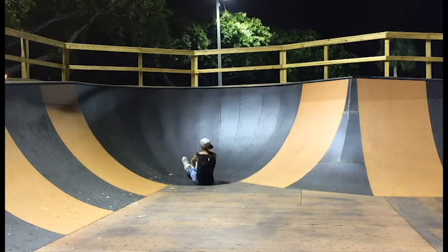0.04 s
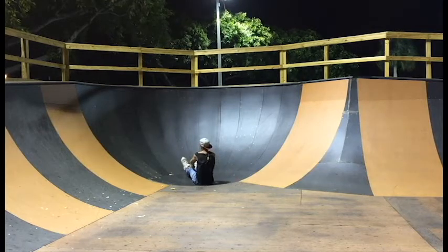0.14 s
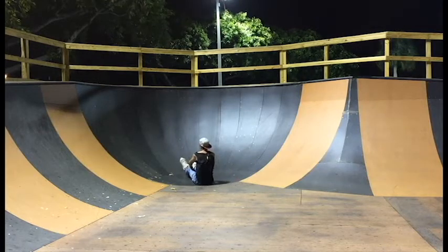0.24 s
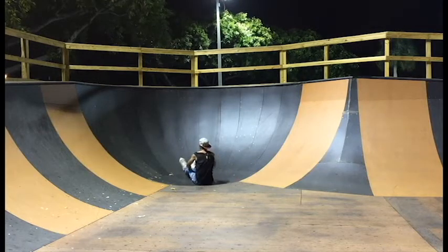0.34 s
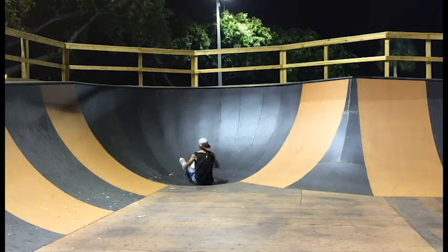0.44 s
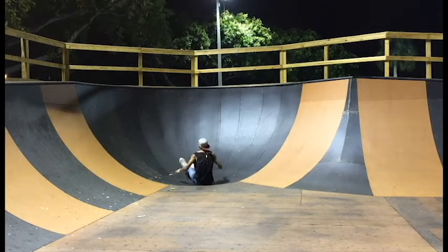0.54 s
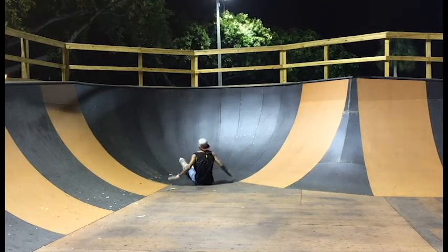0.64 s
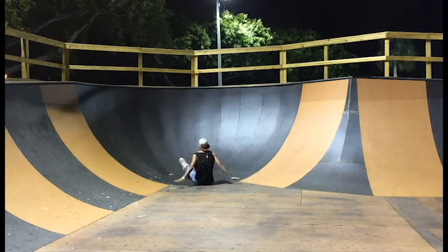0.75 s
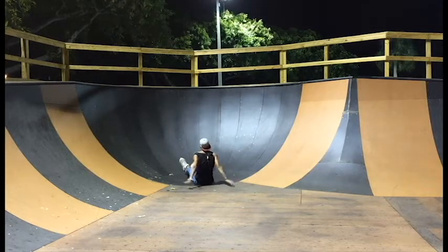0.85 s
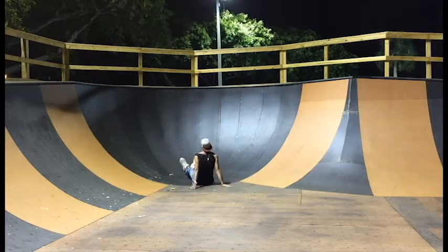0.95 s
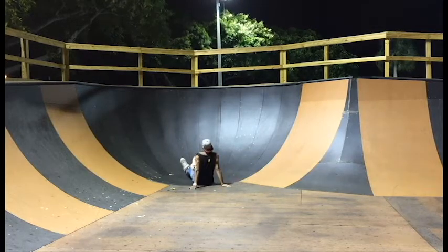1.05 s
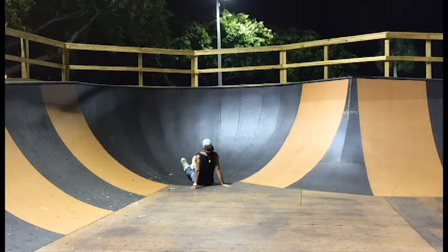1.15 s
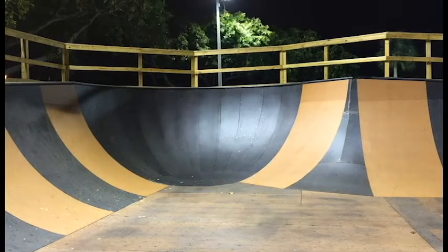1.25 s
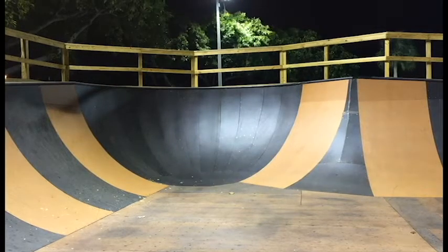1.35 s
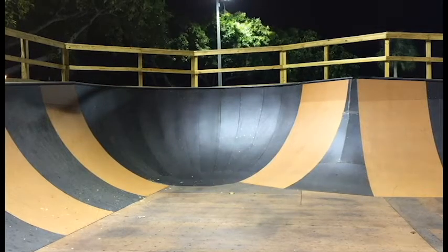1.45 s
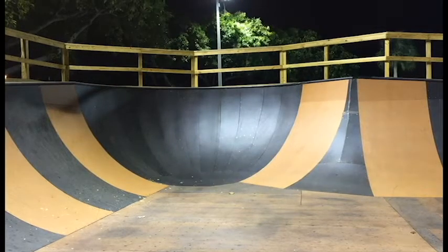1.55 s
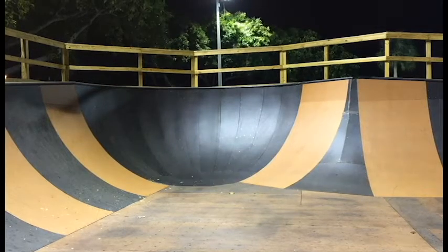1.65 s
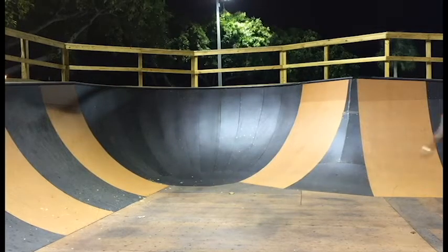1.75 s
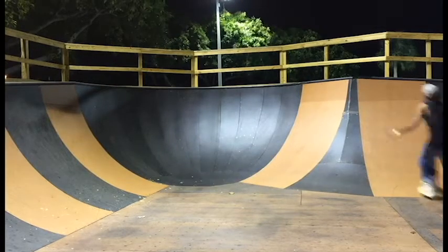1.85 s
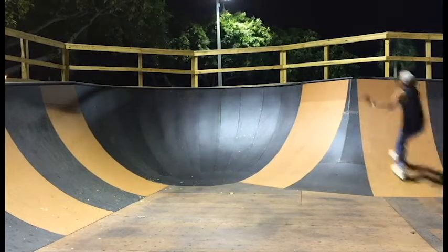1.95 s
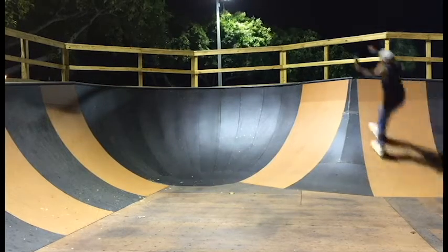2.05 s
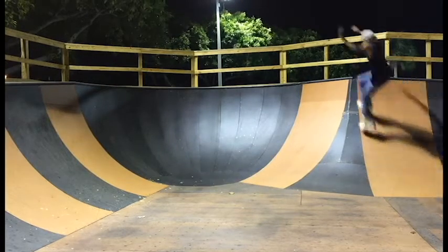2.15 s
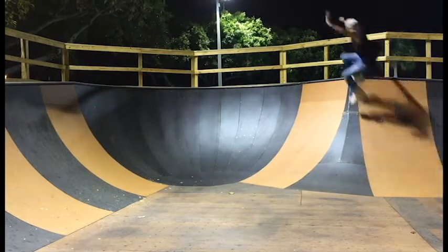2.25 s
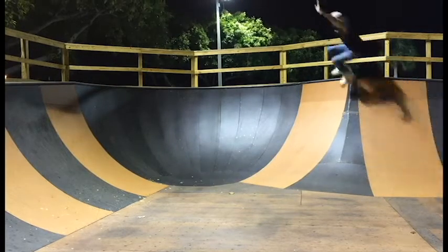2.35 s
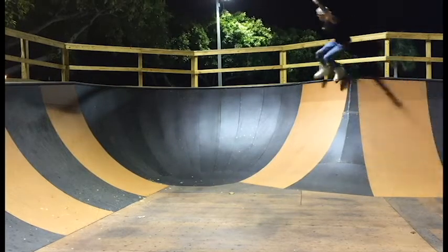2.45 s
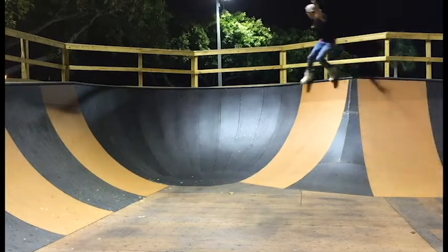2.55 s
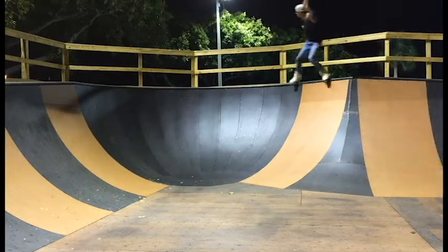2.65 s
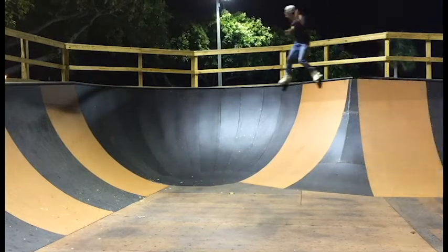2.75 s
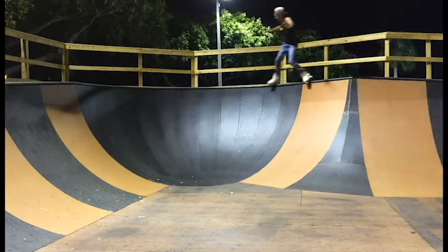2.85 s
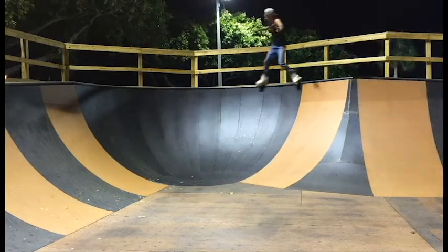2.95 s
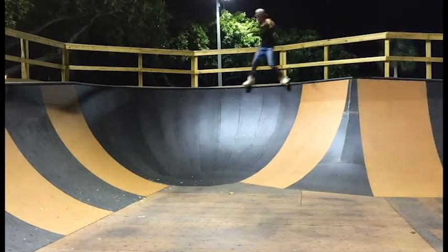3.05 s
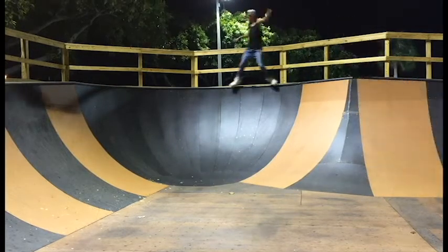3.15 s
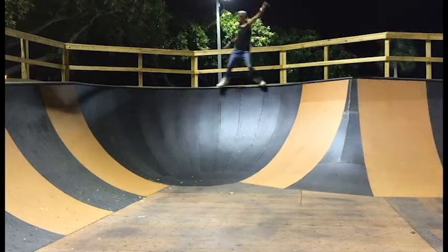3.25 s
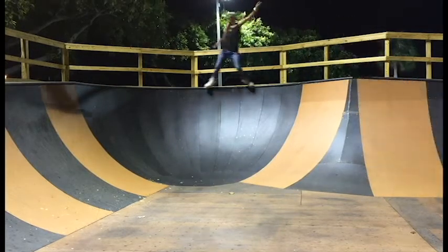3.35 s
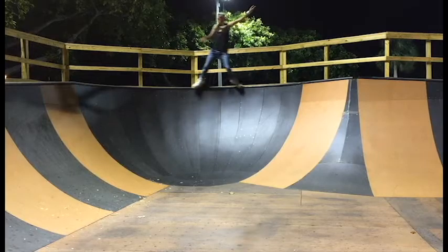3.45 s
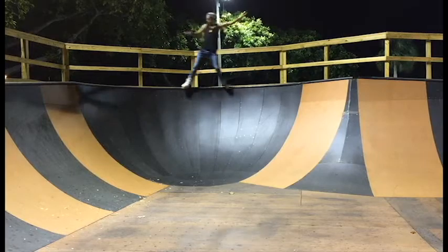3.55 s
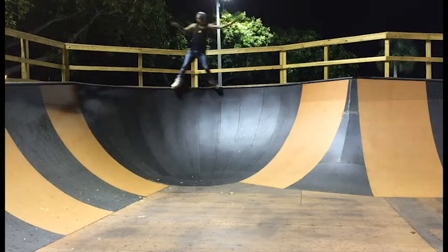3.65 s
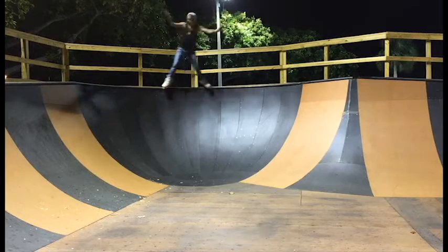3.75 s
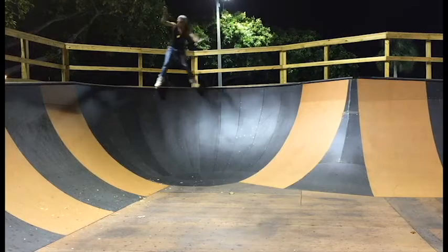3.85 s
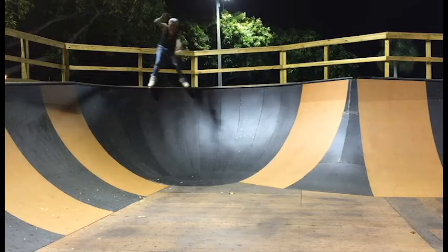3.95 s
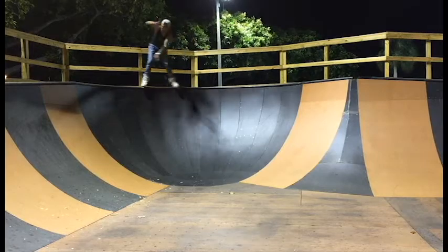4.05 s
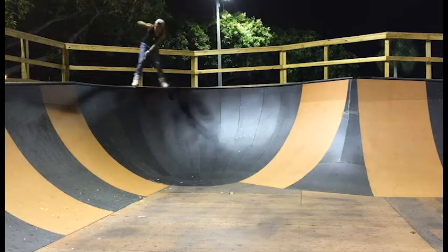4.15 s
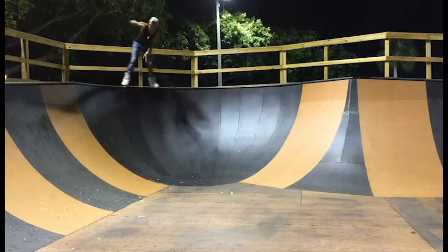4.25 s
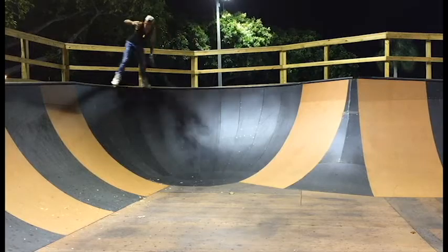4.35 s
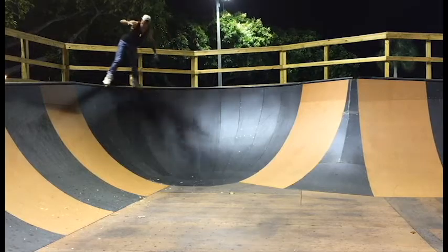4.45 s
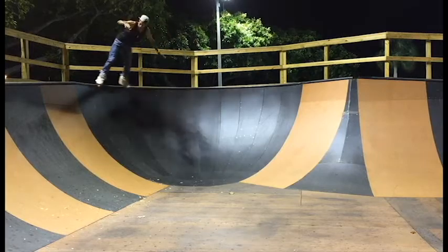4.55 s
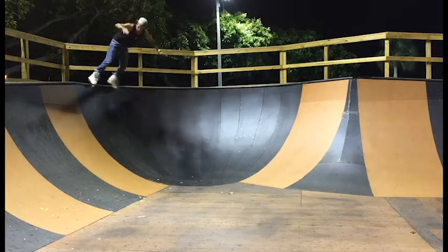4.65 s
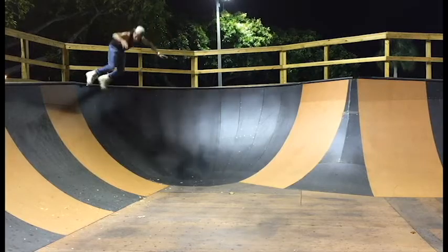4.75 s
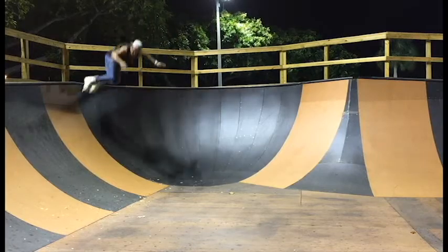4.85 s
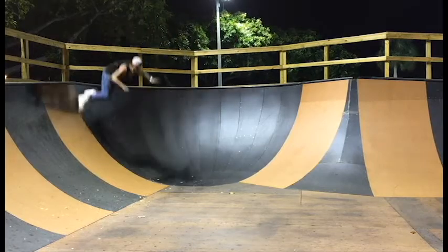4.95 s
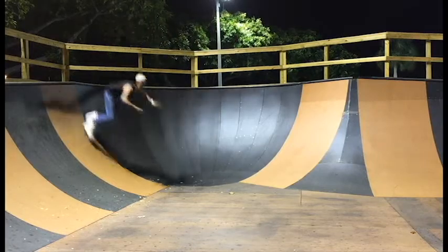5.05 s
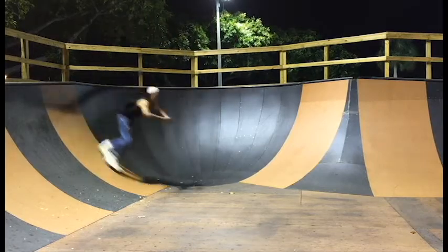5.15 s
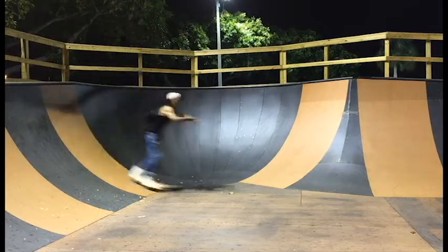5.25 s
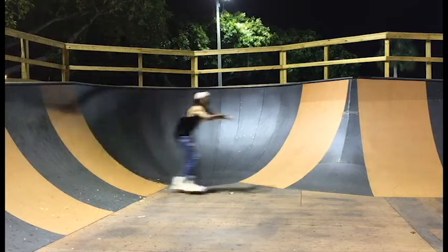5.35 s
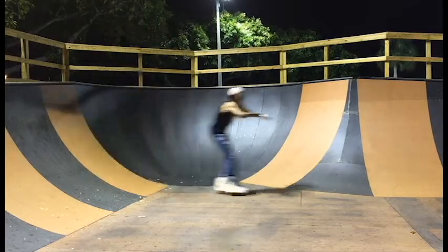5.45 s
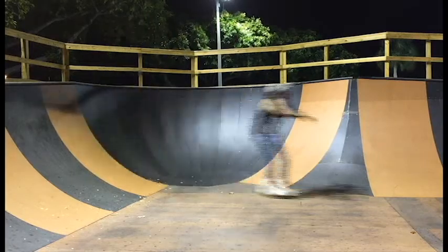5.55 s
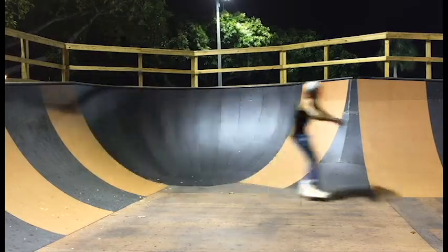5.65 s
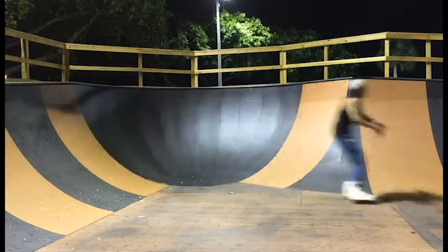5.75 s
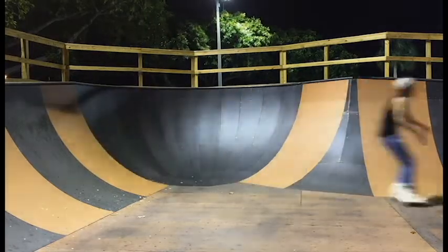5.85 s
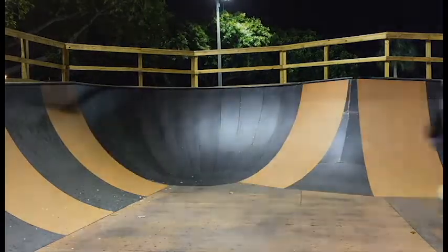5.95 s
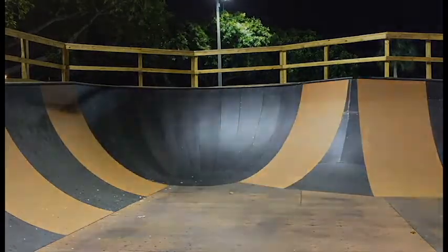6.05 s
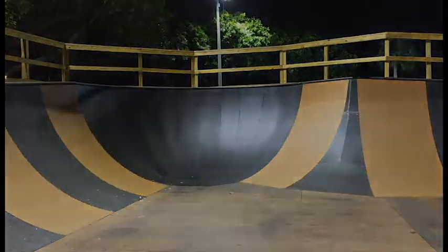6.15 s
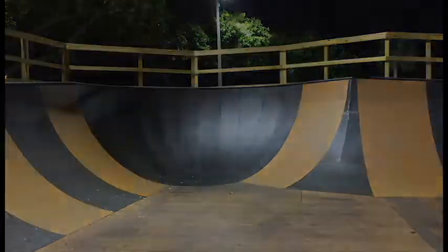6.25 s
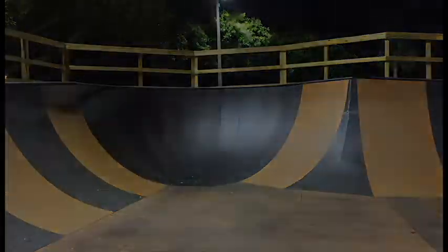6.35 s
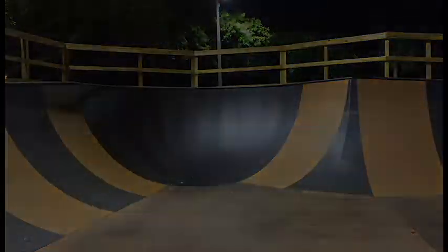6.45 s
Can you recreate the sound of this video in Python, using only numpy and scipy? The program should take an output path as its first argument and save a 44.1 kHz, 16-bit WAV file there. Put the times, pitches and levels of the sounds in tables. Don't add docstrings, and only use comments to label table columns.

```python
import sys
import numpy as np
from scipy import signal
from scipy.fft import rfft, irfft, next_fast_len
from scipy.io import wavfile
from scipy.ndimage import uniform_filter1d, map_coordinates

SR = 44100
rng = np.random.default_rng(int(sys.argv[2]) if len(sys.argv) > 2 else 0)


def invert_db(x):
    u = np.asarray(x, float) / 20
    return 10 ** u


def log_audio(samples):
    frames = np.atleast_2d(samples).T
    limited = np.clip(frames, -1, 1)
    pcm = np.round(limited * 32767).astype(np.int16)
    wavfile.write(sys.argv[1], SR, pcm)


N = 286893
T = np.arange(N) / SR

# start in seconds, peak level in dB, pitch in Hz.
THUMPS = [(1.221, -23.5, 88), (1.356, -16.5, 123), (1.558, -9, 111), (1.607, -5, 104.7), (1.763, -9, 92),
          (1.846, -22, 175), (2.084, -16, 155), (2.6775, 2, 137), (2.912, -12, 128.4), (2.979, -6, 140.5),
          (3.074, -10, 189), (3.307, -7, 117), (3.384, -13, 154.6), (3.539, -9.5, 221.6),
          (3.663, -18.5, 177.6), (4.197, -19.5, 189), (4.503, -5.5, 128), (4.666, -17.5, 181.2),
          (4.796, -17, 205), (4.93, -21, 115.5), (5.15, -3, 176.5), (5.365, -22, 143), (5.475, -7, 126.7),
          (5.852, -17.5, 161), (6.013, -18, 224.5)]
# start in seconds, peak level in dB, pitch in Hz.
KNOCKS = [(1.016, -36, 620), (1.231, -18, 376), (1.398, -29, 930), (1.426, -13, 715), (1.572, -24, 1190),
          (1.609, -20, 810), (1.798, -24.5, 634), (1.851, -20.5, 440), (1.888, -26, 580),
          (1.92, -25.5, 563), (2.044, -26.5, 640), (2.675, -25, 750), (2.739, -24, 403),
          (2.778, -26.5, 800), (3.126, -19, 1240), (3.565, -22, 1300), (3.659, -20.5, 493),
          (4.054, -30.5, 510), (4.497, -23, 386), (4.802, -18, 720), (5.142, -8, 587), (5.1536, -7, 827),
          (5.161, -9, 430), (5.471, -19.5, 393), (5.502, -14.5, 424), (5.598, -25.5, 555),
          (5.731, -19, 385), (6.015, -19.5, 394), (6.047, -25.5, 567), (6.471, -27, 930)]
# start in seconds, peak level in dB, bright part in dB.
CLACKS = [(1.4269, -23.5, -17), (1.849, -29, -2), (1.8848, -28.5, -15), (1.921, -30, -9),
          (2.6716, -20.5, 9.5), (2.6742, -10.5, -49.5), (2.7312, -19.5, -17), (2.8, -32, -9),
          (2.9109, -31, -21), (3.1108, -24, -19), (3.1245, -21, -25), (3.534, -25, -10), (3.5653, -30, -14),
          (3.599, -27, -19), (3.6615, -27, -19), (3.1192, -22, -6), (3.8715, -37, -16), (3.913, -34, -2),
          (3.973, -23, -27), (4.03, -35, -10), (4.46, -35, -5), (4.499, -27, -8), (4.6665, -26, -3),
          (4.7872, -34, -8), (4.802, -24, -21), (5.1412, -20, -18), (5.1538, -10.5, -26),
          (5.1595, -13, -22), (5.473, -23.5, -5), (6.4695, -26, -10)]
# start in seconds, peak level in dB, pitch in Hz.
RIM_RINGS = [(3.884, -11.5, 180.2), (4.084, -11.5, 172), (4.283, -20, 174.2), (4.387, -16.5, 167.5)]
# start in seconds, peak level in dB, pitch in Hz, 60 dB decay in seconds.
SWAY = [
    (5.17, -28, 48, 0.37),
    (6.12, -20, 74.5, 0.21),
    (2.735, -3, 134, 0.11),
]

# pitch in Hz, width in Hz, level in dB.
WIDE_SHEET_MODES = [(63, 7, -16.5), (91.5, 27, 5.5), (102.3, 61.2, 3.5), (137.2, 34.8, -1)]
# pitch in Hz, width in Hz, level in dB.
RIM_MODES = [(133.8, 17, -8), (171.9, 9.3, 0.5), (207.3, 15.6, -2.5), (255.2, 39.6, -8)]
# pitch in Hz, width in Hz, level in dB.
FRAME_MODES = [(1475, 400, 10), (1350, 2200, -7), (1660, 83, 2)]
# pitch in Hz, width in Hz, level in dB.
COPING_MODES = [(2966, 140, -8), (4570, 120, -18.5)]
# pitch in Hz, width in Hz, level in dB.
BEARING_MODES = [(9340, 1400, 0)]
# pitch in Hz, width in Hz, level in dB, swells per second.
CRICKETS = [(7000, 60, 3.5, 14), (7270, 92, 2, 11), (7110, 110, -2, 26), (6840, 170, -6, 18)]

# frequency in Hz, level in dB per Hz.
TRAFFIC = [(15, -67), (25, -22), (58, -3.5), (113, -2.5), (241, -16), (269, -13.5), (371, -27), (572, -19),
           (881, -25), (1320, -21.5), (1430, -24.5), (4950, -44.5), (7030, -37.5), (7630, -42.5),
           (15800, -44)]
# frequency in Hz, level in dB per Hz.
RATTLE = [(200, -40), (300, 3), (500, -4.5), (850, -7), (1100, -8), (1500, -31.5)]
# frequency in Hz, level in dB per Hz.
TREAD = [(700, -76), (1200, 10.5), (2200, 4), (3500, -2.5), (5500, -2), (8000, -5.5), (11000, -3.5),
         (15500, -10.5)]
# frequency in Hz, level in dB per Hz.
BRIGHT_BAND = [(2800, -14), (3500, -0.5), (6200, -4.5), (7200, -12.5)]
# frequency in Hz, level in dB per Hz.
SCRAPE = [(1200, -44), (1900, -6), (2600, 7), (4000, -8.5), (6000, -12.5), (9000, -23), (15500, -57)]
# frequency in Hz, level in dB per Hz.
STEEL_GRIT = [(3000, -33), (4500, -9.5), (6200, 0.5), (7800, -7.5), (8900, 9), (10500, -11), (15500, -30)]
# frequency in Hz, level in dB per Hz.
BOOT = [(700, -21), (1100, 10), (2300, 10), (2800, 0), (4000, -43.5)]
# frequency in Hz, 60 dB decay in seconds.
BOWL = [(150, 0.18), (1500, 0.11), (8000, 0.1)]
# frequency in Hz, level in dB.
MIC = [(20, -12), (45, 2), (2200, -1), (2750, -6), (3500, -1), (6500, -7.5), (8200, -11.5), (9300, -10),
       (10600, -14.5), (15000, -16)]
# time in seconds, delay in milliseconds.
FLOOR_PATH = [(1.2, .25), (1.35, .295), (1.75, .61), (2.05, .78), (2.2, .81), (5.5, .93), (5.75, .915),
              (5.95, .85), (6.5, .64)]

# time in seconds, load on the deck in dB, contact speed in dB.
RIDE = [
    [(1.195, -19, -43), (1.3, -31, -42.5), (1.47, -27, -43), (1.7, -27.5, -43), (2.11, -26.5, -42),
     (2.27, -24.5, -44), (2.39, -52, -46.5), (2.665, -50, -51.5)],
    [(2.675, -17, -58), (2.75, -16.5, -48.5), (2.85, -33, -55), (2.95, -27, -60), (3.13, -21, -49.5),
     (3.55, -22, -47.5), (4.12, -23, -50.5), (4.25, -29, -51.5), (4.84, -22, -58)],
    [(5.16, -13, -64), (5.2, -21, -46.5), (5.28, -27, -40), (5.52, -18.5, -40.5), (5.63, -32.5, -43.5),
     (6.05, -26.5, -45), (6.28, -35.5, -48), (6.5, -34.5, -50.5)],
]
# peak in seconds, level in dB, rise in dB per second, fall in dB per second.
PIPE_SINGS = [(2.68, -36, 909, 177), (3.3, -51, 25, 63), (3.66, -39, 72, 128), (4.08, -44, 72, 95)]
# peak in seconds, level in dB, rise in dB per second, fall in dB per second.
BOOT_DRAGS = [(4.5, -39.5, 120, 70), (4.68, -49, 201, 120), (4.84, -37.5, 130, 615)]
# peak in seconds, level in dB, rise in dB per second, fall in dB per
BRIGHT_SWELLS = [(1.31, -44, 60, 90), (1.46, -37, 90, 66.6), (5.38, -38.5, 125, 100), (6.03, -54, 25, 30)]

CUT_S, GRIND_S, HOP_S = 1.1946, (2.6735, 4.88), (4.875, 5.16)
TAKEOFF_S, TURNED_S = 2.2, 5.3
HOP_T60_S, TOUCH_S = 0.11, 0.054

TRAFFIC_DB = (-44.5, -45)
CRICKET_DB, CHORUS_SWING_DB = -63, 3
STIFF_SHARE = (0.46, 0.46, 0.48)
RATTLE_DB, RATTLE_GROWS = (-13.5, -17, -14), 0.51
FRAME_DB, FRAME_GROWS = (4, 12, 6), (0.45, 0.52)
SLOWING_S, SLOWING_DB_PER_S = 4.2, -29
MIRROR_SHARE = 0.65
MIRROR_CLEAR_S = (1.1, 0.17)
ALOFT_SHARE = 0.24
TICKS_PER_S, TICK_DB, TICK_SCATTER_DB = 36, 5.5, 4.5
THUMP_T60_S, HARD_DAMPS, RIM_T60_S = 0.072, 0.34, 0.25
CLACK_HZ, CLACK_T60_S, STEEL_DULLS_DB = (1660, 1546), 0.023, -5
GRIT_DB, GRIT_STIRRED_DB, GRIT_RISE_S, GRIT_T60_S = -15, 9, 0.012, 0.25


def unit(x):
    return x / np.sqrt(np.mean(x ** 2) + 1e-20)


def along(points, hz):
    f, value = np.transpose(points)
    return np.interp(np.log(hz + 1), np.log(f + 1), value)


def curves(rows):
    s, *columns = np.transpose(rows)
    return [np.interp(T, s, column) for column in columns]


def wobble(rate):
    knots = rng.standard_normal(int(N * 400 / SR) + 4)
    return map_coordinates(knots, [np.arange(N) * rate / SR])


def filtered(x, response):
    size = next_fast_len(N + 8192)
    hz = np.fft.rfftfreq(size, 1 / SR)
    return irfft(rfft(x, size) * response(hz), size)[:N]


def shape(points):
    return lambda hz: invert_db(along(points, hz))


def modes(rows):
    def response(f):
        total = 0
        for k, (center, width, db) in enumerate(rows):
            resonance = 1j * f * width / (center * center - f * f + 1j * f * width)
            total = total + (-1) ** k * invert_db(db) * resonance
        return total
    return response


def sharp_modes(rows):
    return lambda f: modes(rows)(f) ** 2


def grit(response, lumpy_db, rate):
    force = invert_db(lumpy_db * wobble(rate)) * rng.standard_normal(N)
    return unit(filtered(force, response))


def add(track, s, sound):
    part = track[round(s * SR):][:len(sound)]
    part += sound[:len(part)]


def ring(hz, t60, attack, size=SR // 4):
    t = np.arange(size) / SR
    return np.sin(2 * np.pi * hz * t) * invert_db(-60 * t / t60) * (1 - np.exp(-t / attack))


def phases(*values):
    after = np.where(T < HOP_S[1] - TOUCH_S, values[1], values[2 % len(values)])
    return np.where(T < GRIND_S[0], values[0], after)


def on_coping():
    return (T > GRIND_S[0]) & (T < GRIND_S[1])


def ride():
    leaving = (T - HOP_S[0]) / HOP_T60_S
    returning = (HOP_S[1] - T) / TOUCH_S
    aloft_db = -60 * np.clip(np.minimum(leaving, returning), 0, None)
    load_db, speed_db = curves(sum(RIDE, []))
    return load_db + aloft_db, speed_db + 3 * aloft_db


def swells(rows):
    gain = 0
    for s, db, rise, fall in rows:
        drop_db = np.where(T < s, rise * (s - T), fall * (T - s))
        gain = gain + invert_db(db - drop_db)
    return gain


def night():
    traffic_db = np.where(T < CUT_S, *TRAFFIC_DB)
    traffic = invert_db(traffic_db) * grit(shape(TRAFFIC), lumpy_db=1.86, rate=11)
    chorus = np.zeros(N)
    for hz, width, db, rate in CRICKETS:
        chorus += invert_db(db) * grit(sharp_modes([(hz, width, 0)]), lumpy_db=4.0, rate=rate)
    chorus_db = CRICKET_DB + CHORUS_SWING_DB * wobble(5.06)
    return traffic + invert_db(chorus_db) * unit(chorus)


def joint_knocks():
    track = np.zeros(N)
    for s, db, hz in KNOCKS:
        knock = ring(hz, t60=0.016, attack=0.0013, size=1500)
        knock += 0.5 * ring(1.418 * hz, t60=0.014, attack=0.0032, size=1500)
        knock += 0.5 * ring(0.643 * hz, t60=0.018, attack=0.0021, size=1500)
        add(track, s, invert_db(db + 8.5) * knock)
    return track


def bowl(x):
    hz, t, z = signal.stft(rng.standard_normal(SR // 2), SR, nperseg=256)
    decay = invert_db(-60 * t / along(BOWL, hz)[:, None])
    tail = signal.istft(z * decay, SR, nperseg=256)[1]
    late = np.pad(x, (250, 0))
    return signal.fftconvolve(late, tail / np.linalg.norm(tail))[:N]


def deck_boom():
    def band(f):
        return f ** 2 / (f ** 2 + 55 ** 2) / (1 + (f / 330) ** 4)

    wide = grit(lambda f: modes(WIDE_SHEET_MODES)(f) * band(f), lumpy_db=1.0, rate=33)
    rim = grit(lambda f: modes(RIM_MODES)(f) * band(f), lumpy_db=1.5, rate=47)
    turn = phases(*STIFF_SHARE) * np.pi / 2
    boom = np.cos(turn) * wide + np.sin(turn) * rim
    swell = np.abs(uniform_filter1d(boom ** 2, size=3000)) + 1e-3
    load_db, _ = ride()
    return invert_db(load_db - 3.5) * unit(boom / swell ** 0.13)


def sheet_rattle():
    load_db, _ = ride()
    level_db = phases(*RATTLE_DB) - 27 + RATTLE_GROWS * (load_db + 27)
    return invert_db(level_db + 1.0) * grit(shape(RATTLE), lumpy_db=3.0, rate=72)


def wheel_tread():
    tread = grit(shape(TREAD), lumpy_db=1.0, rate=170)
    return tread + invert_db(-17.5) * grit(sharp_modes(BEARING_MODES), lumpy_db=3.0, rate=330)


def skate_frame():
    _, speed_db = ride()
    level_db = phases(*FRAME_DB) - 45.5 + phases(*FRAME_GROWS) * (speed_db + 43.5)
    level_db += on_coping() * SLOWING_DB_PER_S * np.clip(T - SLOWING_S, 0, None)
    noise = grit(sharp_modes(FRAME_MODES), lumpy_db=2.5, rate=120)
    return invert_db(level_db - 3.0) * noise * invert_db(0.28 * on_coping() * wobble(14))


def mirrored(x):
    path_ms, = curves(FLOOR_PATH)
    facing = 0.5 + (T - CUT_S) / MIRROR_CLEAR_S[0]
    run_up = np.where(T < TAKEOFF_S, facing, ALOFT_SHARE)
    roll_away = (T - TURNED_S) / MIRROR_CLEAR_S[1]
    strength = MIRROR_SHARE * np.clip(phases(run_up, 0, roll_away), 0, 1)
    copy = filtered(x, lambda hz: 1 / (1 + (hz / 12000) ** 4))
    return x - strength * map_coordinates(copy, [np.arange(N) - path_ms * SR / 1000], order=3)


def bearing_ticks():
    track = np.zeros(N)
    _, speed_db = ride()
    gap, size, tune = rng.standard_normal((3, 400))
    times = CUT_S + np.cumsum(np.abs(gap)) / TICKS_PER_S
    for s, size_here, tune_here in zip(times, size, tune):
        if s < GRIND_S[0] or HOP_S[1] < s < N / SR:
            db = speed_db[int(s * SR)] + TICK_DB + TICK_SCATTER_DB * size_here
            add(track, s, invert_db(db) * ring(9650 + 290 * tune_here, t60=0.024, attack=0.00012, size=1500))
    return track


def deck_thumps():
    track = np.zeros(N)
    blows = [(s, db, hz, THUMP_T60_S * invert_db(-HARD_DAMPS * db)) for s, db, hz in THUMPS]
    blows += [(*row, RIM_T60_S) for row in RIM_RINGS]
    for s, db, hz, t60 in blows + SWAY:
        thump = ring(hz, t60, attack=0.0048)
        thump += 0.29 * ring(1.55 * hz, 1.15 * t60, attack=0.0077)
        add(track, s, invert_db(db - 0.16) * thump)
    return track


def bright_swells():
    return swells(BRIGHT_SWELLS) * grit(shape(BRIGHT_BAND), lumpy_db=2.0, rate=65)


def clacks():
    track, t = np.zeros(N), np.arange(SR // 4) / SR
    low = signal.butter(1, [1000, 3800], "band", fs=SR, output="sos")
    high = signal.butter(2, [5500, 14000], "band", fs=SR, output="sos")
    burst = invert_db(-60 * t / CLACK_T60_S) * (1 - np.exp(-t / 0.0018))
    for s, db, bright_db in CLACKS:
        noise = rng.standard_normal(len(t))
        sliding = GRIND_S[0] + 0.1 < s < GRIND_S[1]
        bright = invert_db(bright_db + STEEL_DULLS_DB * sliding) * unit(signal.sosfilt(high, noise))
        crack = unit(signal.sosfilt(low, noise)) + bright
        hz = CLACK_HZ[int(GRIND_S[0] < s < GRIND_S[1])]
        frame = 1.66 * ring(hz, 0.5 * CLACK_T60_S, attack=0.00015)
        add(track, s, invert_db(db - 1.5) * (burst * crack + frame))
    return track


def stirred():
    gain, t = np.ones(N), np.arange(SR // 4) / SR
    cloud = invert_db(GRIT_STIRRED_DB - 60 * t / GRIT_T60_S) * (1 - np.exp(-t / GRIT_RISE_S))
    for s, *_ in CLACKS:
        add(gain, s - GRIT_RISE_S, cloud)
    return gain


def coping_scrape():
    scrape = grit(shape(SCRAPE), lumpy_db=2.5, rate=140)
    crushed = grit(shape(STEEL_GRIT), lumpy_db=5.5, rate=120)
    return scrape + invert_db(GRIT_DB + 2.9 * wobble(22.04)) * stirred() * crushed


def coping_pipe():
    return on_coping() * swells(PIPE_SINGS) * grit(sharp_modes(COPING_MODES), lumpy_db=3.5, rate=30)


def boot_drag():
    return on_coping() * swells(BOOT_DRAGS) * grit(shape(BOOT), lumpy_db=2.5, rate=180)


def buckle():
    track = np.zeros(N)
    add(track, 5.1992, invert_db(-17) * ring(3400, t60=0.006, attack=0.00013))
    return track


def skates():
    _, speed_db = ride()
    contact = np.where(on_coping(), coping_scrape(), wheel_tread())
    hiss = invert_db(speed_db + phases(2.9, 1.55)) * contact
    direct = sheet_rattle() + coping_pipe() + boot_drag()
    return direct + mirrored(hiss + skate_frame() + bright_swells())


def scene():
    hits = joint_knocks() + bearing_ticks() + deck_thumps() + clacks() + buckle()
    hits = filtered(hits, lambda f: 1j * f / (50 + 1j * f))
    riding = (T > CUT_S) * (deck_boom() + skates())
    return (night() + riding + hits + invert_db(-8) * bowl(hits))[None]


def band_limit(x):
    return signal.sosfilt(signal.butter(12, 16480, fs=SR, output="sos"), x)


def record(dry):
    coloured = filtered(dry[0], lambda hz: shape(MIC)(hz) * (hz < 15830))
    held = coloured / (1 + np.abs(coloured / 0.68) ** 4) ** (1 / 4)
    return band_limit(held[None])


dry = scene()
out = record(dry)
log_audio(out)
```